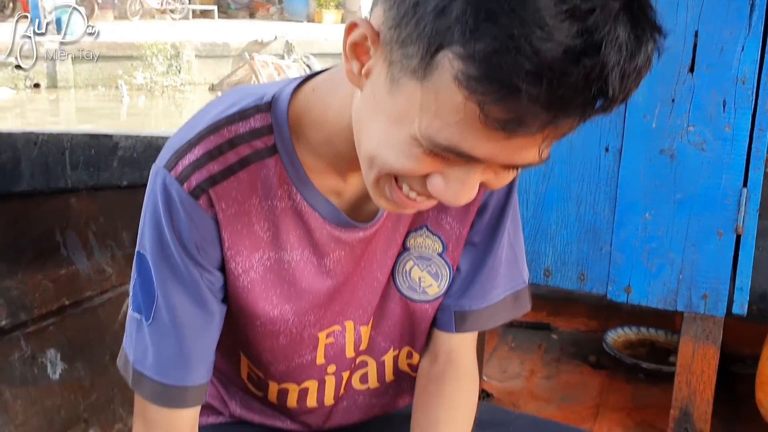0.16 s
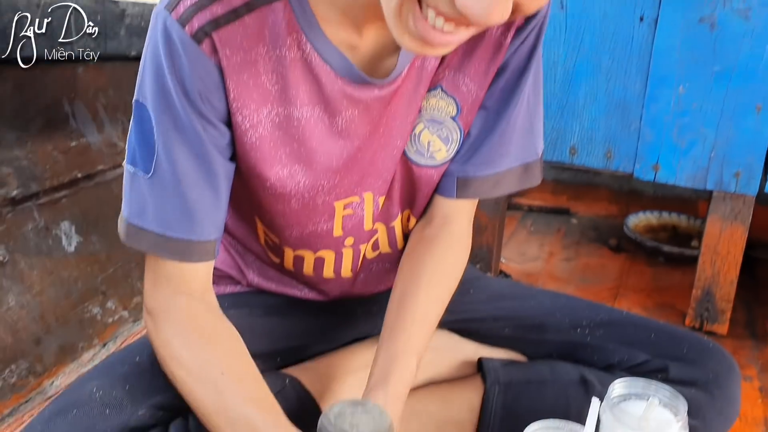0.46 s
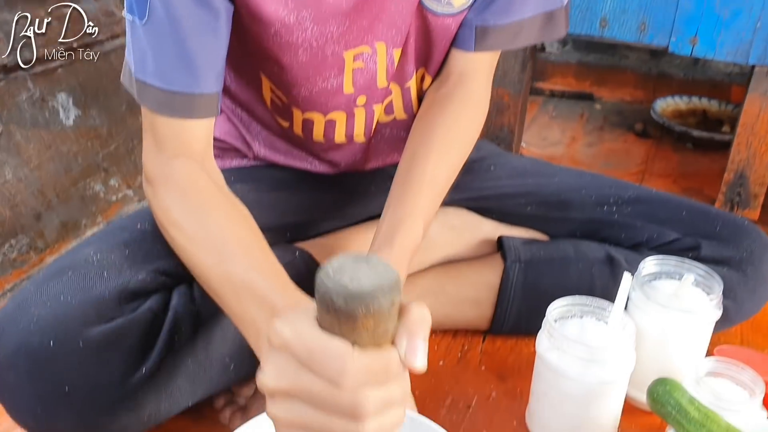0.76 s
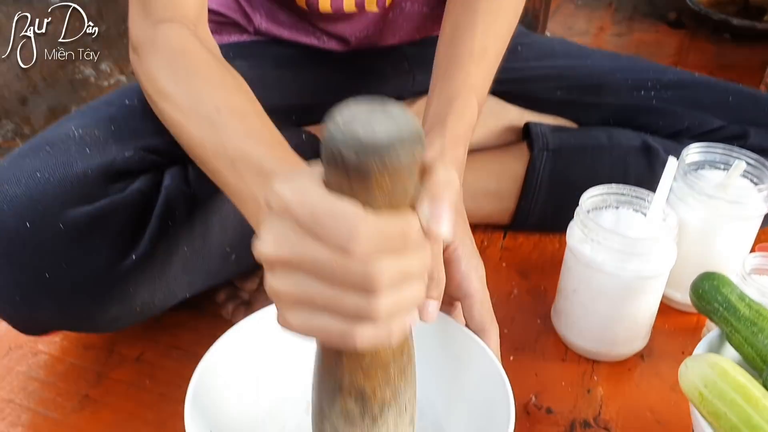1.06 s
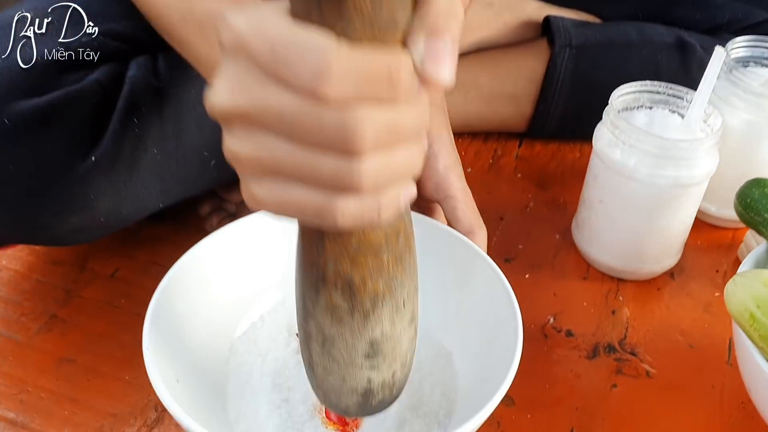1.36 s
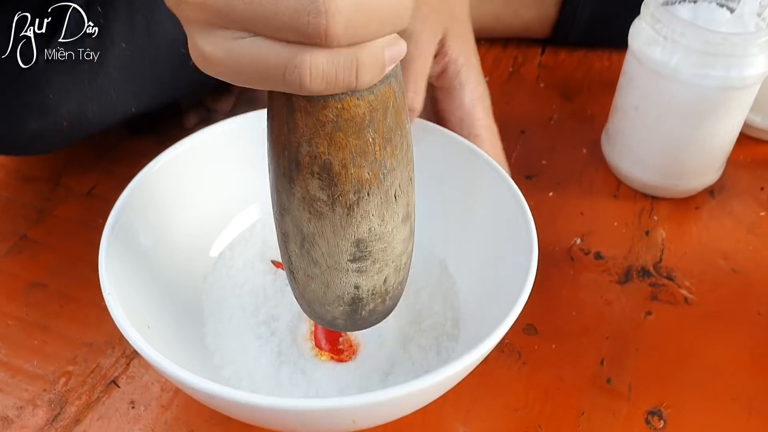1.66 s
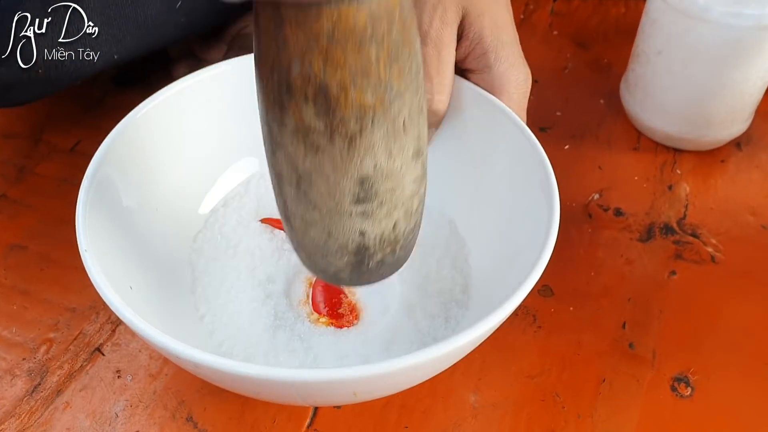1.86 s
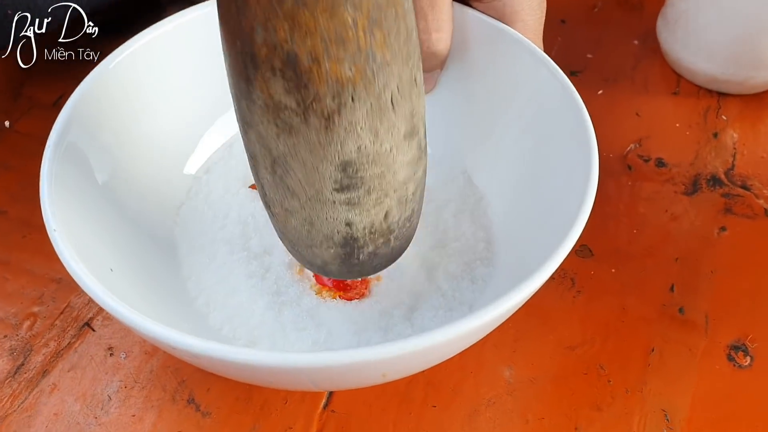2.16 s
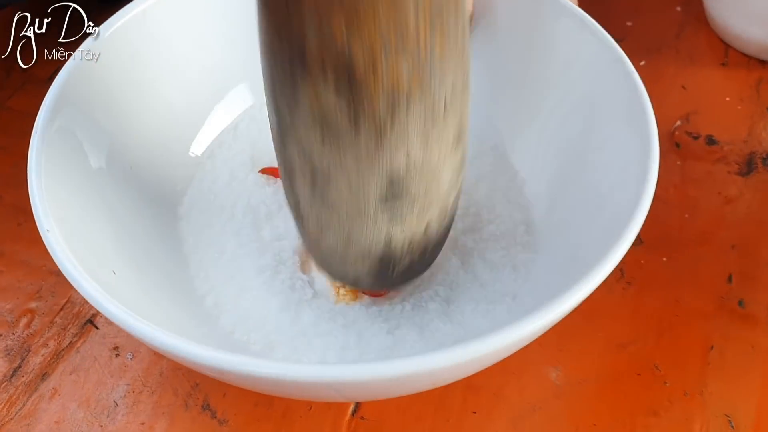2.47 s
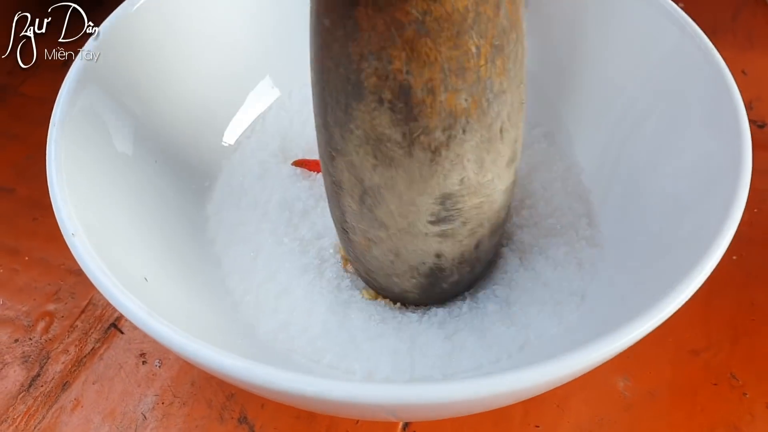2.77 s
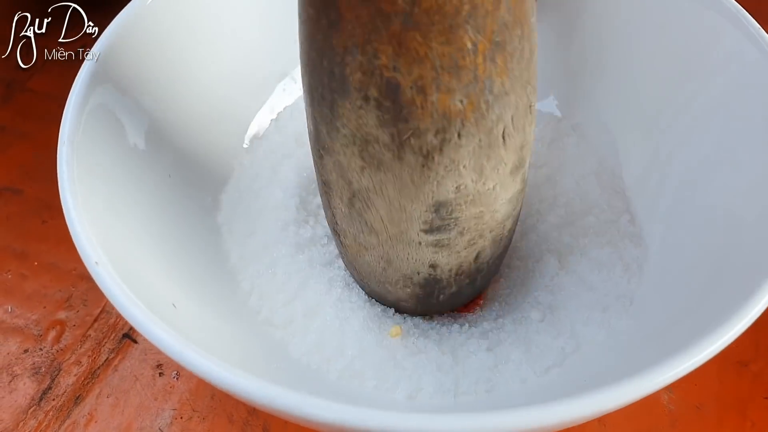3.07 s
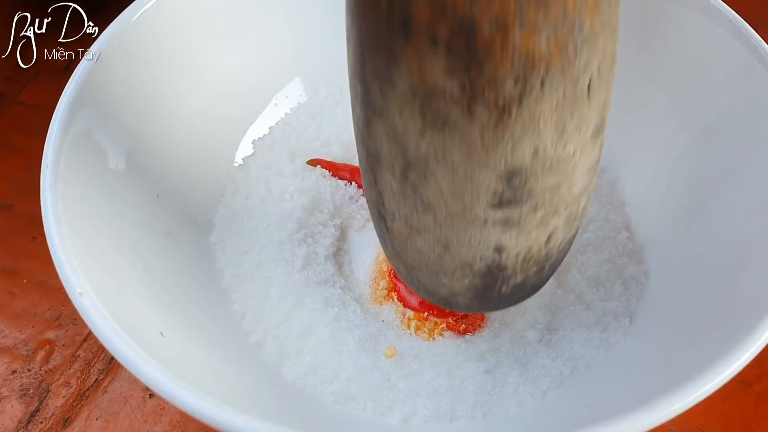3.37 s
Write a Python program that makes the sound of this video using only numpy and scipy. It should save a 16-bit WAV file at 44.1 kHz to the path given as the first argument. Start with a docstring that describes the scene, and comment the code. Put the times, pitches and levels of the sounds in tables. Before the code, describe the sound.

A wooden pestle pounds salt and chilies in a ceramic bowl, thirteen close, steady knocks from about 0.2 to 3.3 seconds, roughly four a second. Each crunches lightly and booms through the wooden boat deck. The bowl sometimes bounces on the plank and rings on briefly after 0.7 seconds. Soft bumps fall near 0.3 and 1.6 seconds. A faint, low engine thrum and fading outdoor hiss lie underneath.

```python
"""Crunching, booming knocks: a wooden pestle pounds salt and chilies in a ceramic bowl on a boat's deck.
Each blow cracks salt grains, knocks the hand-damped bowl and drives the planks and the air below them.
Now and then the bowl rings on or drops back on the plank; two soft bumps fall between blows.
A low engine-like thrum and a faint outdoor hiss lie underneath."""
import sys
import numpy as np
from scipy import signal
from scipy.fft import rfft, irfft, next_fast_len
from scipy.io import wavfile
from scipy.ndimage import uniform_filter1d

SR = 44100
rng = np.random.default_rng(int(sys.argv[2]) if len(sys.argv) > 2 else 0)


def int16_out(signal):
    """Quantize to a 16-bit WAV file."""
    q = np.round(np.clip(np.atleast_2d(signal).T, -1, 1) * 32767)
    wavfile.write(sys.argv[1], SR, q.astype(np.int16))


N = 154350
T = np.arange(int(.9 * SR)) / SR  # time within one hit, s
HIT_SAMPLES = int(.05 * SR)
BOOM_HZ, CONTACT_RISE_S = 108.13, 0.0012


def pounding():
    """Pestle blows on one spot of the deck; after some, the bowl drops back on the plank."""
    # Each row: start in seconds, body and knock pitch in Hz, then levels in dB of boom, thump, body,
    # knock, clack, snap, salt crunch, squeak, grit and bowl ring, then ring t60 in seconds.
    blows = [(0.1623, 353, 1020, -23, -24.5, -16.5, -20.5, -25, -37.5, -51, -55, -56.5, -40, 0.19),
             (0.4651, 346, 895, -20.5, -20.0, -18, -28, -41.5, -49.5, -47, -48.5, -53.5, -27, 0.086),
             (0.7172, 349, 880, -20.5, -20.5, -16.5, -21, -28, -35.5, -46, -49.5, -58, -30.5, 1.16),
             (0.9984, 367, 1330, -18, -22.5, -18, -19.5, -21.5, -33, -43, -51.5, -62.5, -25, 0.32),
             (1.2504, 371, 1437, -21.5, -25, -22.5, -19, -21, -34.5, -46, -45.5, -60.5, -37, 0.24),
             (1.502, 372, 1405, -21, -22.0, -19.5, -20.5, -23.0, -36.5, -50.5, -48, -61.5, -36.5, 0.39),
             (1.751, 453, 1280, -19.5, -21, -17.5, -21.0, -27, -38.5, -50, -49.5, -53, -20.5, 0.24),
             (2.0079, 420, 1606, -22, -24.5, -20.5, -22.5, -26, -30, -44.5, -48.5, -56.5, -33.5, 0.27),
             (2.2613, 498, 962, -21, -22.0, -18.5, -24, -32.5, -44, -51, -42, -53, -43, 0.097),
             (2.513, 462, 1006, -23.5, -24.5, -20.5, -18.5, -28.5, -38, -50.5, -47.5, -60, -27.5, 0.22),
             (2.792, 482, 1066, -22, -23, -15.0, -20.5, -31, -42.5, -49.0, -47.5, -55, -35.5, 0.16),
             (3.035, 486, 1163, -20.5, -24.5, -18, -20.5, -32, -44.5, -48.5, -51, -53, -36.5, 0.22),
             (3.2767, 493, 1064, -22, -25.5, -17.5, -19.5, -28, -37, -48.5, -46, -55.5, -27.5, 0.32)]
    # Each row: start in seconds, level in dB.
    rebounds = [(0.4831, -22.5), (0.7351, -23), (1.7563, -36.5), (2.2681, -25), (2.7979, -23.5)]
    out = np.zeros((2, N))
    spot_noise = stereo_noise(len(T), side=0.62)  # common to all blows
    for start, body_hz, knock_hz, boom_db, *wood_db, crunch, squeak, grit, ring_db, ring_t60_s in blows:
        blow = wood(body_hz, knock_hz, wood_db, spot_noise) + boom(boom_db)
        add(out, blow + bowl_ring(ring_db, ring_t60_s), start)
        add(out, salt([crunch, squeak, grit]), start - 0.002)
    for start, db in rebounds:
        thud = hit_level(np.sin(2 * np.pi * 420 * T) * T * fade(0.0076), db)
        add(out, np.array([thud, thud]), start)
    return out


def wood(body_hz, knock_hz, levels_db, spot_noise):
    """Contact excites planks, deck and bowl; the salt bed cushions it and sets the band balance."""
    # Each row: frequency in Hz, gain through the salt bed in dB.
    cushion = [(2700, -6), (4500, -22), (8000, -45.5)]
    # Each row: low and high edge in Hz; thump, body, knock, clack, snap.
    wood_bands = [(150, 280), (300, 600), (800, 1200), (1250, 1950), (2050, 2900)]
    dense = planks(spot_noise + stereo_noise(len(T), side=0.62))
    dense *= 1 + undb(-0.5) * fade(0.046)  # the plank under the bowl is loudest at first
    modes = hit_level(deck(), 0) + hit_level(band(bowl_chink(), 1400, 2900), -20)
    hit = knock(body_hz, knock_hz) + (hit_level(dense, 6) + modes) * rise(CONTACT_RISE_S)
    return balance(colour(hit, cushion), wood_bands, levels_db)


def knock(body_hz, knock_hz, sag_s=0.075):
    """Pestle contact: a few quick cycles and a sagging hollow tone, echoed by nearby boards."""
    onset = rise(CONTACT_RISE_S)
    tap = -np.sin(2 * np.pi * knock_hz * T) * onset * fade(0.0032)
    body_cycles = np.cumsum(1.114 * body_hz * np.exp(-T / sag_s)) / SR
    body = -np.sin(2 * np.pi * body_cycles) * onset * fade(0.055)
    direct = hit_level(tap, -1.5) + hit_level(body, 1)
    echoes = np.array([np.interp(T - lag_s, T, direct, left=0) for lag_s in (0.00174, 0.004317)])
    return direct + undb(-11) * echoes


def planks(noise):
    """Dense plank modes as noise: treble dies first, bass is alike on both sides."""
    # Each row: frequency in Hz, spectral density in dB.
    spectrum_db = [(30, -18), (55, -9), (130, -4.5), (260, -1.5), (440, 1.5), (680, -4), (1100, -4.5),
                   (2150, -10.5), (6000, -53.5)]
    # Each row: frequency in Hz, t60 in seconds.
    decays = [(100, 0.27), (420, .25), (1100, 0.12), (4000, 0.12)]
    spec = rfft(noise)
    hz = np.arange(spec.shape[1]) * SR / len(T)
    mid = spec.mean(axis=0)
    spec = mid + (spec - mid) * np.minimum(hz / 450, 1)
    centres_hz, t60s = zip(*decays)
    out = 0
    for weights, t60_s in zip(np.eye(len(decays)), t60s):
        share = along(hz, list(zip(centres_hz, weights)))
        out += irfft(spec * share, len(T)) * fade(t60_s)
    return colour(out, spectrum_db)


def deck():
    """Distinct deck modes; higher ones die sooner."""
    # Each row: frequency in Hz, relative level in dB.
    deck_modes = [(159, 0), (223, -6.5), (288, -10.5), (365, 0.5), (444, 3.5), (497, -2.5), (581, -16),
                  (775, -11.5), (904, -13.5), (965, -10.5), (1335, -6.5)]
    modes = [(hz, db, 0.37 * (BOOM_HZ / hz) ** 0.31) for hz, db in deck_modes]
    return ring(modes, scatter_db=7, wide_hz=1500)


def boom(db, swell_s=0.021, beat_hz=20):
    """The air under the deck swells and beats."""
    beat = 1 + .3 * np.sin(2 * np.pi * beat_hz * (T - swell_s))
    return hit_level(np.sin(2 * np.pi * BOOM_HZ * T) * rise(swell_s) * beat * fade(0.27), db)


def salt(levels_db, lead_s=.003, settle_t60_s=0.11, grain_samples=12):
    """Crystals give way just ahead of contact, crack, then settle; each grain chinks on the glaze."""
    # Each row: frequency in Hz, spectral density in dB.
    spectrum_db = [(500, -10), (4000, -3), (7100, 4), (7900, -10.5), (11500, -6.5), (15500, -20.5)]
    # Each row: low and high edge in Hz; crunch, squeak, grit.
    salt_bands = [(3300, 5200), (5600, 7500), (8500, 15000)]
    after_s = np.maximum(T - lead_s, 0)
    crack = fade(.013)[(after_s * SR).astype(int)]
    settle = undb(-7 - 60 * after_s / settle_t60_s)
    envelope = np.where(T < lead_s, undb(-8.5), crack + settle)
    sizes = undb(22 * np.repeat(rng.random(len(T)), grain_samples)[:len(T)])
    grains = rng.standard_normal((2, len(T))) * sizes * envelope
    chinks = signal.fftconvolve(grains, bowl_chink(), axes=1)[:, :len(T)]
    crunch = colour(hit_level(grains, 0) + hit_level(chinks, -11), spectrum_db)
    return balance(crunch, salt_bands, levels_db) * undb(-1)


def bowl_ring(db, t60_s, hz=712, freed_s=.028, held_gain=0.26):
    """The bowl's lowest mode blooms as the pestle eases off."""
    bloom = held_gain + (1 - held_gain) * (1 - np.exp(-(T / freed_s) ** 4))
    return np.sin(2 * np.pi * hz * T) * bloom * undb(db - 60 * (T - freed_s) / t60_s)


def bowl_chink():
    """The ceramic bowl's brief upper modes."""
    # Each entry: mode frequency in Hz.
    modes_hz = [1701, 2087, 2547, 5905, 6234, 6468, 7020, 7190, 8640, 9450, 9660, 11296, 12623, 13783]
    return ring([(hz, 0, .075) for hz in modes_hz], scatter_db=5.5, wide_hz=6870)


def bumps(rise_s=0.021):
    """Soft, dull nudges of the bowl on the deck."""
    # Each row: start in seconds, level in dB, roll-off in Hz, t60 in seconds.
    nudges = [(0.346, -35, 1117, 0.12), (1.604, -47.5, 1430, 0.049)]
    out = np.zeros((2, N))
    for start, db, top_hz, t60_s in nudges:
        push = stereo_noise(len(T), side=0.25) * fade(t60_s) * (1 - np.exp(-T / rise_s))
        dull = colour(push, [(70, -12), (300, 0), (top_hz, -10), (2 * top_hz, -36), (15000, -70)])
        add(out, hit_level(dull, db), start)
    return out


def outdoor_air():
    """Faint noise that sinks in level; two hiss bands come and go."""
    # Each row: frequency in Hz, spectral density in dB.
    spectrum_db = [(20, -10), (45, -3), (280, 1), (1500, -22), (6500, -33.5), (8500, -43), (16000, -57.5)]
    # Each row: time in seconds, level in dB.
    trend = [(0, -43.5), (1.2, -45.5), (1.5, -52), (2.5, -54)]
    air = colour(stereo_noise(N, side=.6), spectrum_db)
    air *= undb(np.interp(np.arange(N) / SR, *np.array(trend).T)) / air.std()
    spec = rfft(air, 2 * N)
    hz = np.arange(N + 1) * SR / (2 * N)
    for low_hz, high_hz in (900, 2500), (2500, 7500):
        hiss = irfft(spec * ((hz > low_hz) & (hz < high_hz)))[:, :N]
        air += hiss * (undb(1.5 * walk(9.2)) - 1)
    return air


def engine_thrum():
    """A far engine: low tones wavering in level and phase."""
    # Each row: frequency in Hz, rms level in dB.
    tones = [(41, -47.5), (51, -43.5), (62, -51)]
    t = np.arange(N) / SR
    out = 0
    for hz, db in tones:
        amplitude = np.sqrt(2) * undb(db - 1.5 * walk(6.38))
        out += amplitude * np.sin(2 * np.pi * hz * t + 0.865 * walk(10))
    return out


def placement(x, lag_s=.0001):
    """The blows reach the right side later, with more clack."""
    # Each row: frequency in Hz, right over left in dB.
    tilt = [(1100, 0.28), (2000, 1.5)]
    t = np.arange(N) / SR
    left = colour(x[0], [(hz, -db / 2) for hz, db in tilt])
    right = colour(x[1], [(hz, db / 2) for hz, db in tilt])
    return np.array([left, np.interp(t - lag_s, t, right)])


def ring(modes, scatter_db, wide_hz):
    """Modes vary with each strike; high ones reach the two sides out of phase."""
    out = 0
    for k, (hz, db, t60_s) in enumerate(modes):
        size, detune, lag = rng.uniform(-1, 1, 3)
        side_rad = lag * min(hz / wide_hz, 1) * np.array([[1], [-1]])
        tone = np.sin(2 * np.pi * hz * (1 + .005 * detune) * T + side_rad)
        out += (-1) ** k * undb(db + scatter_db * size) * fade(t60_s) * tone
    return out


def undb(db):
    return 10 ** (np.asarray(db) / 20)


def rise(time_s):
    return 1 - np.exp(-(T / time_s) ** 2)


def fade(t60_s):
    return np.exp(-np.log(1000) * T / t60_s)


def hit_rms(x):
    return np.sqrt(np.mean(x[..., :HIT_SAMPLES] ** 2))


def hit_level(x, db):
    """Set the rms of the first 50 ms."""
    return x * undb(db) / hit_rms(x)


def along(hz, points):
    """Interpolate (Hz, value) points over log frequency."""
    points_hz, values = np.array(points, float).T
    return np.interp(np.log(np.maximum(hz, 1)), np.log(points_hz), values)


def colour(x, points):
    """Minimum-phase filter through (Hz, dB) points."""
    n = 2 * next_fast_len(x.shape[-1])
    gain = undb(along(np.arange(n // 2 + 1) * SR / n, points))
    cepstrum = irfft(np.log(gain))
    cepstrum[1:n // 2] *= 2
    cepstrum[n // 2 + 1:] = 0
    return irfft(rfft(x, n) * np.exp(rfft(cepstrum)))[..., :x.shape[-1]]


def band(x, low_hz, high_hz):
    return signal.sosfilt(signal.butter(4, [low_hz, high_hz], "band", fs=SR, output="sos"), x)


def balance(x, bands_hz, levels_db):
    """Equalise a hit toward the given band levels."""
    centres_hz = [np.sqrt(low * high) for low, high in bands_hz]
    for _ in range(2):
        band_rms = [hit_rms(band(x[:, :HIT_SAMPLES], *edges)) for edges in bands_hz]
        gains_db = np.array(levels_db) - 20 * np.log10(band_rms)
        x = colour(x, list(zip(centres_hz, gains_db)))
    return x


def stereo_noise(size, side):
    shared, opposed = rng.standard_normal((2, size))
    return np.array([shared + side * opposed, shared - side * opposed]) / np.hypot(1, side)


def walk(rate_hz):
    """Smooth random drift of unit spread."""
    hold = int(SR / rate_hz)
    steps = np.repeat(rng.standard_normal(N // hold + 1), hold)
    drift = uniform_filter1d(uniform_filter1d(steps, hold), hold)[:N]
    return drift / drift.std()


def add(out, x, start_s):
    i = int(start_s * SR)
    out[:, i:i + len(T)] += x[:, :N - i]


def scene():
    """Pounding and bumps over air and engine."""
    return placement(pounding()) + bumps() + outdoor_air() + engine_thrum()


def record(dry):
    """Round the highest peaks; pass 28 Hz to 16 kHz."""
    rounded = dry / (1 + dry ** 6) ** (1 / 6)
    low_cut = signal.sosfilt(signal.butter(2, 28, "high", fs=SR, output="sos"), rounded)
    return signal.sosfilt(signal.ellip(8, .2, 80, 16000, fs=SR, output="sos"), low_cut)


dry = scene()
out = record(dry)
int16_out(out)
```